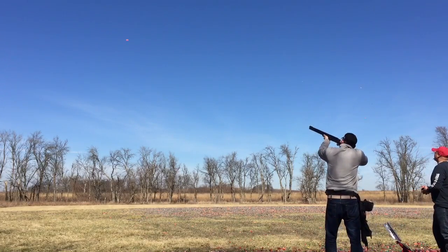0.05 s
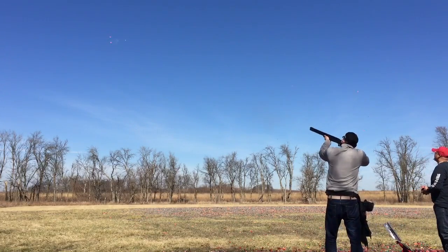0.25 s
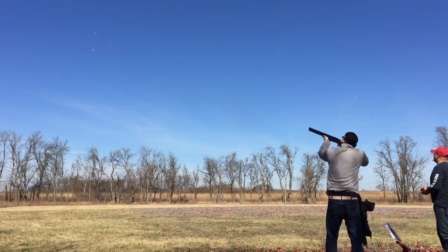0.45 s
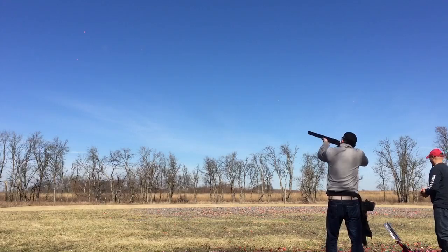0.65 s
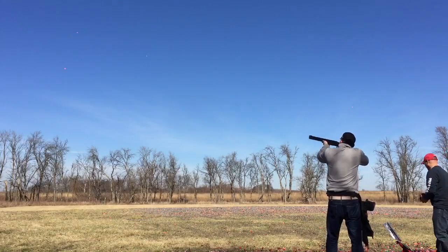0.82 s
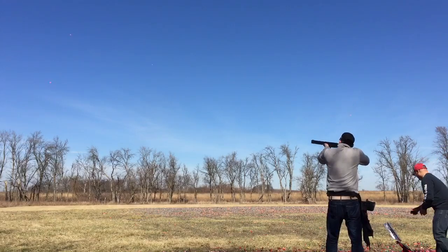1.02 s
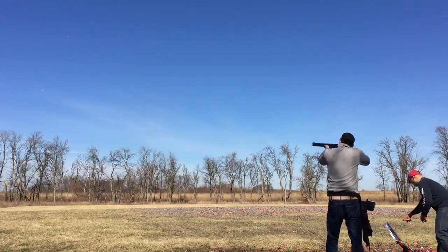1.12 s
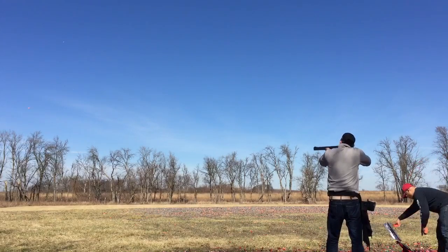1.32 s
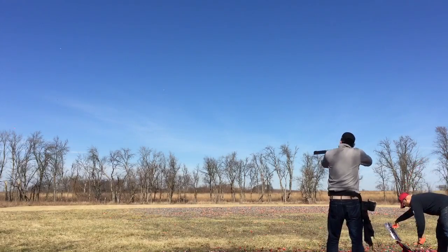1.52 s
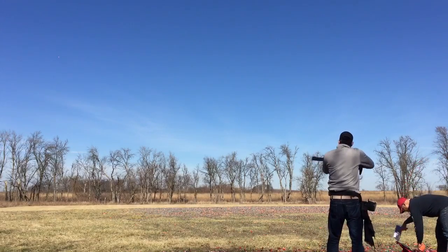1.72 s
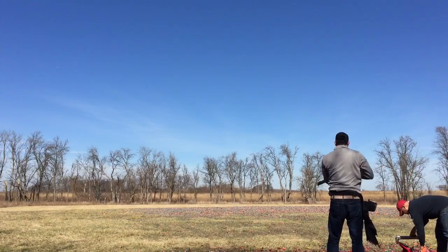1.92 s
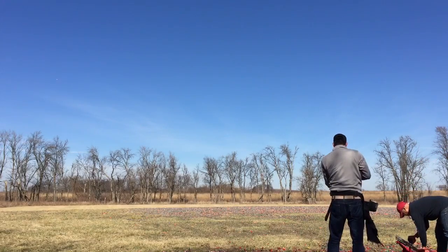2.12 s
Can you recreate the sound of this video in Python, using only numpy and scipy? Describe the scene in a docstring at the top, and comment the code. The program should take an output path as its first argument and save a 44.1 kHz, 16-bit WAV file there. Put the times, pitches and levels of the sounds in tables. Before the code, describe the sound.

In an open field, a nearby shotgun fires once with a sharp, slightly distorted bang. Dull echoes roll off the tree line and die away, then equipment clacks and rattles over a faint, low motor drone.

```python
"""An open field, a few metres from a shotgun. A motor drones low and the echo of an earlier shot is still rolling.
The action clicks, the muzzle blast overloads the microphone, and the tree lines reflect it, duller with
distance as the air absorbs the treble. The gain control ducks everything after the shot and recovers slowly.
Then gear is handled: impacts ring as hard clacks, and sliding contacts as short rattles."""
import sys
import numpy as np
from scipy import signal
from scipy.io import wavfile

SR = 44100
rng = np.random.default_rng(int(sys.argv[2]) if len(sys.argv) > 2 else 0)


def generate_wav(sig):
    """Save sig (samples, or channels by samples) to the path in sys.argv[1] as 16-bit PCM at SR."""
    pcm = np.round(np.clip(np.atleast_2d(sig).T, -1, 1) * 32767).astype(np.int16)
    wavfile.write(sys.argv[1], SR, pcm)


N = 94815
T = np.arange(N) / SR
SHOT_S = .2093
EDGES_HZ = np.geomspace(22, 19000, 25)
CENTRES_HZ = np.sqrt(EDGES_HZ[1:] * EDGES_HZ[:-1])
# Spectrum of contact noise between hard parts: frequency_hz, density_db
CONTACT_SPECTRUM = [(200, -21), (700, -10), (1300, 0.5), (2200, 1.5), (3000, -5), (4200, -4), (7000, -7.5),
                    (10000, -12), (12500, -14), (16000, -25)]


def from_db(db):
    """Amplitude ratio of a level in decibels."""
    return 10 ** (np.asarray(db) / 20)


def unit_rms(x):
    """Normalisation to unit power."""
    return x / np.sqrt(np.mean(x ** 2) + 1e-20)


def at_centres(points):
    """Interpolation in log frequency at the band centres."""
    hz, value = np.transpose(points)
    return np.interp(np.log(CENTRES_HZ), np.log(hz), value)


def decay(age_s, t60_s):
    """Exponential decay, 60 dB in t60_s."""
    return np.exp(-np.log(1000) * np.clip(age_s / t60_s, 0, 10))


def swell(start_s, rise_s, t60_s):
    """Linear attack, then exponential decay."""
    return np.clip((T - start_s) / rise_s, 0, 1) * decay(T - start_s - rise_s, t60_s)


def drift(knots_per_s):
    """Random modulation with a spread of about 1."""
    knots = rng.standard_normal(400)
    return np.interp(T * knots_per_s, np.arange(len(knots)), knots)


def noise_bands(grain_share=0, grains_per_s=5000):
    """Band-limited noise, unit power in each band; a share of it is sparse impulses."""
    grains = unit_rms((rng.random(N) < grains_per_s / SR) * rng.standard_normal(N) ** 3)
    white = np.sqrt(1 - grain_share) * rng.standard_normal((2, N)) + np.sqrt(grain_share) * grains
    filters = [signal.butter(4, pair, "band", fs=SR, output="sos") for pair in zip(EDGES_HZ, EDGES_HZ[1:])]
    return np.array([unit_rms(signal.sosfilt(sos, white[k % 2])) for k, sos in enumerate(filters)])


def band_gains(density_db):
    """Spectral density times bandwidth, as gains with total power 1."""
    gain = from_db(density_db) * np.sqrt(np.diff(EDGES_HZ))
    return gain / np.linalg.norm(gain)


def burst(bands, start_s, level_db, rise_s, t60_s, centre_hz, width_octaves):
    """A noise transient with one spectral peak."""
    colour = band_gains(-10 * np.pi * np.log10(1 + (np.log2(CENTRES_HZ / centre_hz) / width_octaves) ** 2))
    return from_db(level_db) * swell(start_s, rise_s, t60_s) * (colour @ bands)


def ring(force, pitch_hz, t60_s):
    """A damped resonator: a unit impulse starts a sine of height 1."""
    radius, angle = decay(1 / SR, t60_s), 2 * np.pi * pitch_hz / SR
    return signal.lfilter([0, np.sin(angle)], [1, -2 * radius * np.cos(angle), radius ** 2], force + 1e-18)


def impulse(start_s):
    """A unit impulse."""
    return 1. * (np.arange(N) == int(start_s * SR))


def low_pass(x, cutoff_hz):
    """A first-order low-pass."""
    pole = np.exp(-2 * np.pi * cutoff_hz / SR)
    return signal.lfilter([1 - pole], [1, -pole], x)


def open_air():
    """Ambient noise: stationary, strongest in the bass."""
    # Background spectrum: frequency_hz, density_db
    spectrum = [(25, -30.5), (55, 0), (100, -2.5), (170, -9.5), (300, -24), (600, -21.5), (1200, -17.5),
                (1900, -27), (2600, -40.5), (3700, -34.5), (4700, -51.5), (9000, -54.5), (16000, -62)]
    return from_db(-43) * (band_gains(at_centres(spectrum)) @ noise_bands())


def motor(fundamental_hz=30.66, wander=.012, throb_db=4.5):
    """A harmonic series without its fundamental drones, wavering in pitch and level."""
    # Harmonics: order, level_db
    harmonics = [(2, -1.5), (3, -10), (4, -20), (5, -23.5)]
    # Envelope of the drone: time_s, level_db
    envelope = [(0, -39), (.11, -36.5), (.3, -39), (.85, -41.5), (1.13, -37), (1.26, -43.5), (1.65, -36.5),
                (2.15, -35.5)]
    turns = np.cumsum(fundamental_hz * (1 + wander * drift(4.4))) / SR
    level_db = np.interp(T, *np.transpose(envelope))
    drone = 0
    for order, db in harmonics:
        amplitude = np.sqrt(2) * from_db(level_db + db + throb_db * drift(32))
        drone += amplitude * np.sin(2 * np.pi * (order * turns + rng.random()))
    return drone


def air_absorbed(shot_s, grain_share):
    """Atmospheric absorption: noise bands lose level with travel time, the treble fastest."""
    loss_db_per_s = 32 * (CENTRES_HZ / 7000) ** 1.3
    return noise_bands(grain_share) * from_db(-np.outer(loss_db_per_s, np.maximum(T - shot_s, 0)))


def diffuse_echo(bands, edge_hz):
    """Diffuse echo from the tree lines, dull, its treble cut steeply above edge_hz."""
    # Echo spectrum: frequency_hz, density_db
    spectrum = [(60, -24), (150, -8.5), (300, -11), (600, -1), (1000, -1.5), (1900, 2), (3000, -3.5),
                (5000, -8), (8000, -16), (15000, -22.5)]
    return (band_gains(at_centres(spectrum)) / np.sqrt(1 + (CENTRES_HZ / edge_hz) ** 10)) @ bands


def earlier_shot():
    """Reverberation: the echo of an earlier shot decays among the trees."""
    bands = air_absorbed(shot_s=-.51, grain_share=.3)
    return from_db(-30) * decay(T, t60_s=2.9) * diffuse_echo(bands, edge_hz=4530)


def gun_action(bands):
    """Impact transients: the action clicks just before the blast."""
    # Clicks: start_s, level_db, rise_s, t60_s, centre_hz, width_octaves
    clicks = [(.1865, -16.5, .0006, .014, 1700, 1.5), (.1897, -28, .0005, .012, 6000, 1.6),
              (.191, -31, .004, .06, 800, 1.2), (.2, -17, .002, .09, 480, .6),
              (.206, -21, .0005, .03, 2200, 1.4)]
    return from_db(-.5) * sum(burst(bands, *row) for row in clicks)


def muzzle_blast(bands):
    """A shock front, heard as a heavily damped sine, and its scattering off the ground."""
    # Blast spectrum: frequency_hz, density_db
    spectrum = [(40, -7.5), (110, -3), (160, -11.5), (240, -4.5), (370, 0.5), (600, -5.5), (950, -1.5),
                (1500, -6.5), (2500, -1), (3500, -11), (5500, -11), (9000, -16.5), (13000, -17),
                (17000, -18.5)]
    # Decay of the scatter: frequency_hz, t60_s
    decay_times = [(60, .18), (400, 0.26), (2000, 0.22), (5000, 0.24), (9000, 0.19), (15000, 0.161)]
    scatter = sum(gain * band * swell(SHOT_S, 1 / SR, t60)
                  for gain, band, t60 in zip(band_gains(at_centres(spectrum)), bands, at_centres(decay_times)))
    shock = ring(impulse(SHOT_S), pitch_hz=1094, t60_s=.013)
    return from_db(9) * scatter + from_db(10) * shock


def gas_push(start_s=.2148, start_hz=122, end_hz=42, glide_s=.0063):
    """Expanding muzzle gas drives a low pressure swing that slows as it dies."""
    age = np.maximum(T - start_s, 0)
    turns = end_hz * age + (start_hz - end_hz) * glide_s * (1 - np.exp(-age / glide_s))
    return -from_db(12) * np.sin(2 * np.pi * turns) * decay(age, t60_s=.09)


def slaps():
    """Early reflections of the blast from things nearby."""
    # Reflections: start_s, level_db
    arrivals = [(0.2248, -3), (0.2422, -12.5), (0.258, -3.5), (0.2725, -2), (0.295, -9.5), (0.3133, -12),
                (.322, -16.5)]
    envelope = sum(from_db(db) * swell(start, rise_s=.0007, t60_s=.035) for start, db in arrivals)
    return envelope * diffuse_echo(noise_bands(), edge_hz=8000)


def tree_echoes(paths):
    """Diffuse reflection: the tree lines answer one after another."""
    # Echoes: start_s, level_db, rise_s, t60_s, edge_hz
    arrivals = [(.31, -26.5, 0.047, 2.7, 9300), (.412, -18.5, 0.028, 0.43, 11000),
                (0.471, -19.5, 0.013, 0.53, 10110), (.56, -37.5, 0.24, 2.6, 5060),
                (.712, -21.5, 0.054, 0.67, 9100), (.78, -32, 0.13, 1.15, 2900)]
    return sum(from_db(db) * swell(start, rise, t60) * diffuse_echo(paths[k % len(paths)], edge)
               for k, (start, db, rise, t60, edge) in enumerate(arrivals))


def firm_echoes(bands):
    """Specular reflection: single large surfaces return short, firm echoes."""
    # Echoes: start_s, level_db, rise_s, t60_s, centre_hz, width_octaves
    arrivals = [(0.4332, -17, 0.0022, 0.032, 1600, 1.5), (0.485, -8.5, 0.0043, 0.033, 660, 1.14),
                (0.539, -18, 0.0012, 0.032, 816, 2.2), (.818, -28, 0.0039, 0.12, 496, .9)]
    return sum(burst(bands, *row) for row in arrivals)


def ticks(bands):
    """Brief contacts radiate mostly treble: bright snaps and faint ticks."""
    # Contacts: start_s, level_db, t60_s, centre_hz, width_octaves
    contacts = [(.551, -40, .07, 14000, .4), (0.979, -63, .03, 9070, 0.61),
                (1.133, -61, 0.016, 13030, 0.34), (1.464, -19, 0.013, 12300, 0.41),
                (1.6355, -37.5, 0.032, 10100, 0.86), (1.8128, -39, 0.0076, 4970, .9),
                (1.871, -37, 0.0043, 6530, .9), (2.0215, -38, 0.036, 5700, 0.98)]
    return sum(burst(bands, start, db, .00032, t60, hz, width) for start, db, t60, hz, width in contacts)


def clacks():
    """Impact excitation: hard parts meet with a dry crack and ring in their modes."""
    # Impacts: start_s, level_db, cutoff_hz
    impacts = [(1.3914, -1, 12350), (1.7735, -5.5, 6000), (2.021, -21.5, 6000)]
    # Reflections off ground and gear: delay_s, level_db
    bounces = [(.0012, -30.5), (.0052, -24.5), (0.0104, -17), (.0155, -28), (.021, -30)]
    # Modes of the parts: pitch_hz, level_db, t60_s
    modes = [(1359, -15.5, .025), (3680, -18, 0.0077), (3940, -1, 0.0067), (4920, -14.5, 0.0039),
             (5550, -4, 0.006), (6600, -17.5, 0.0026), (11000, -18, 0.0017)]
    hits = 0
    for start, db, cutoff in impacts:
        contact = impulse(start) + sum(from_db(loss) * impulse(start + lag) for lag, loss in bounces)
        hits += from_db(db) * low_pass(contact, cutoff)
    crack = from_db(-5) * decay(T, t60_s=.005) * (band_gains(at_centres(CONTACT_SPECTRUM)) @ noise_bands())
    # the modes alternate in polarity, two by two
    body = sum(from_db(db) * ring(hits, hz, t60) * (-1) ** (k // 2) for k, (hz, db, t60) in enumerate(modes))
    return body + signal.fftconvolve(hits, crack)[:N]


def near_tail(sound, level_db, t60_s):
    """Diffuse scattering from the ground and things close by adds a faint, dull tail."""
    response = low_pass(rng.standard_normal(N), 6000) * swell(0, .004, t60_s)
    return sound + from_db(level_db) * signal.fftconvolve(sound, response / np.linalg.norm(response))[:N]


def rattles(bands):
    """Friction: the dense little contacts of sliding gear excite resonances in the metal."""
    # Slides: start_s, level_db, rise_s, t60_s, tilt_db_per_octave
    slides = [(1.461, -30, .001, 0.045, -0.5), (1.4639, -25.5, 0.0013, 0.082, 1.5),
              (1.4912, -21, 0.0026, 0.039, -0.5), (1.507, -38.5, 0.0055, 0.13, -1),
              (1.563, -40.5, 0.0018, 0.077, -1.5), (1.6349, -26, 0.0026, 0.06, 1.5),
              (1.705, -37.5, 0.0038, 0.048, -.5), (1.846, -36.5, 0.0029, 0.032, -2),
              (1.9026, -48.5, 0.0023, 0.24, -1.5), (1.9424, -40, 0.0055, 0.026, -1.5),
              (2.008, -40.5, 0.0017, 0.028, -0.5)]
    # Modes of the metal: pitch_hz, level_db, t60_s
    modes = [(1300, -44, 0.15), (1600, -45, 0.094), (1940, -51, 0.019), (2405, -48, 0.03),
             (4177, -31, 0.027), (5600, -42, 0.085), (7100, -41, 0.029), (12300, -40, .012)]
    rub = 0
    for start, db, rise, t60, tilt in slides:
        colour = band_gains(at_centres(CONTACT_SPECTRUM) + tilt * np.log2(CENTRES_HZ))
        rub += from_db(db) * swell(start, rise, t60) * (colour @ bands)
    return rub + sum(from_db(db) * ring(rub, hz, t60) for hz, db, t60 in modes)


def scene():
    """Superposition of shot, echoes and handled gear over the drone and the open air."""
    gear = near_tail(clacks(), level_db=-19, t60_s=.19)
    gear_noise = noise_bands(grain_share=.5)
    gear += near_tail(ticks(gear_noise) + rattles(gear_noise), level_db=-12.5, t60_s=.44)
    air = open_air()
    shot_noise = noise_bands(grain_share=.3)
    shot = gun_action(shot_noise) + muzzle_blast(shot_noise) + gas_push() + slaps()
    paths = [air_absorbed(SHOT_S, grain_share=.26) for _ in range(3)]
    rolling = earlier_shot() + tree_echoes(paths)
    flutter = from_db(1.22 * drift(70.78))
    return (air + motor() + shot + rolling * flutter + firm_echoes(paths[0]) + gear)[None]


def record(dry, threshold_db=-15.5, max_duck_db=15, attack_s=.011, recover_db_per_s=18):
    """Automatic gain control ducks late, so the blast clips, and recovers slowly; the top is cut."""
    power = signal.lfilter(np.ones(441) / 441, [1], dry[0] ** 2)   # 10 ms mean
    excess_db = np.clip(10 * np.log10(power + 1e-12) - threshold_db, 0, max_duck_db)
    held_db = np.maximum.accumulate(excess_db + recover_db_per_s * T) - recover_db_per_s * T
    duck_db = low_pass(held_db, 1 / (2 * np.pi * attack_s))
    clipped = np.clip(dry * from_db(-duck_db), -1, 1)
    return signal.sosfilt(signal.ellip(10, .1, 70, 17000, fs=SR, output="sos"), clipped)


dry = scene()
out = record(dry)
generate_wav(out)
```